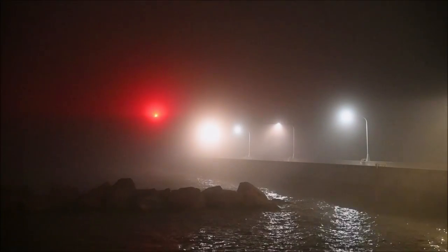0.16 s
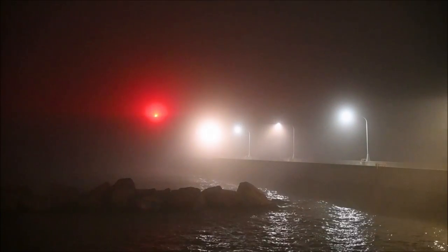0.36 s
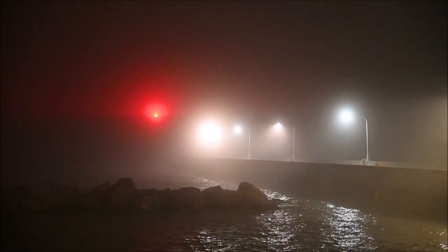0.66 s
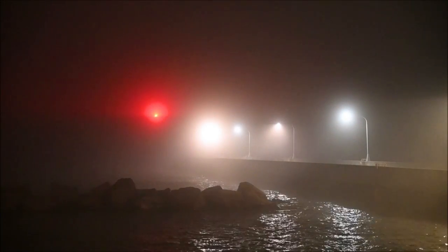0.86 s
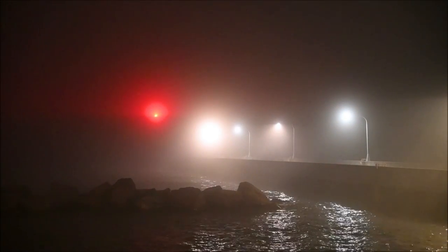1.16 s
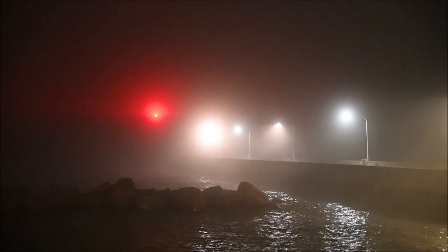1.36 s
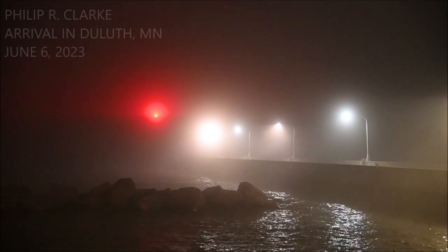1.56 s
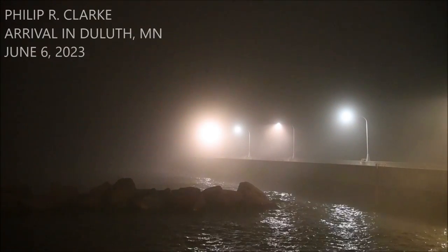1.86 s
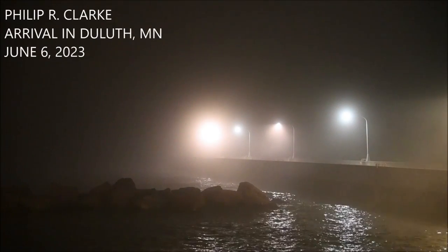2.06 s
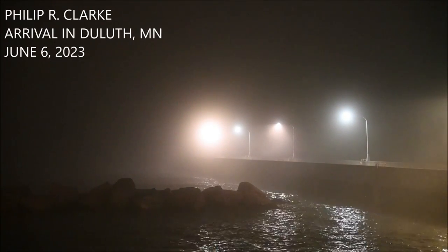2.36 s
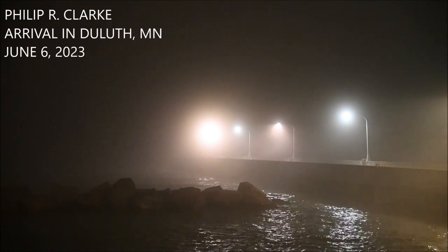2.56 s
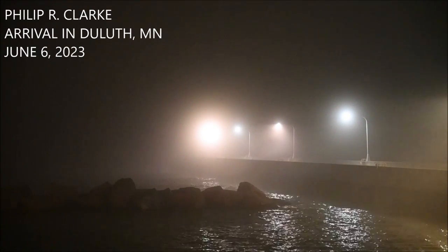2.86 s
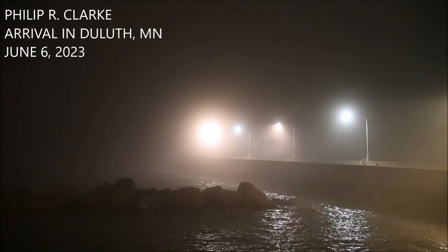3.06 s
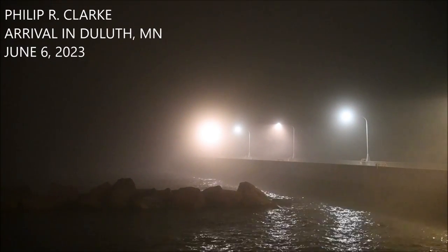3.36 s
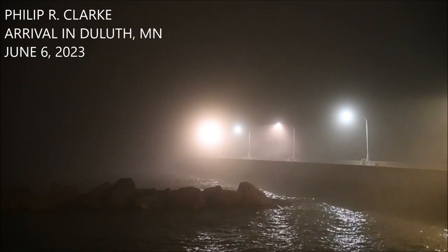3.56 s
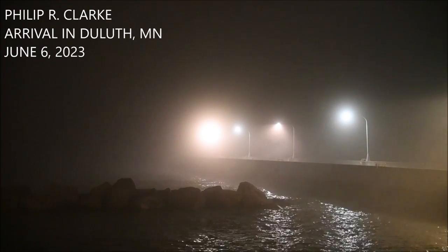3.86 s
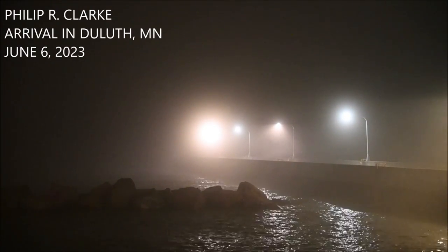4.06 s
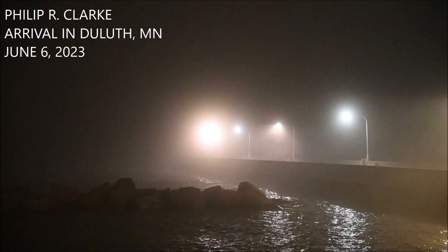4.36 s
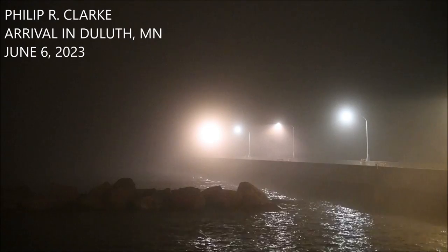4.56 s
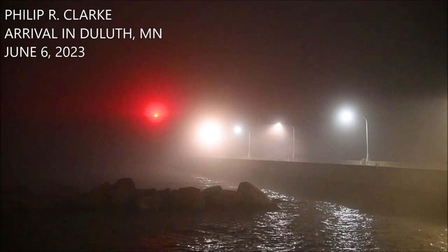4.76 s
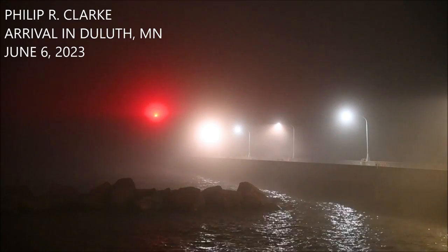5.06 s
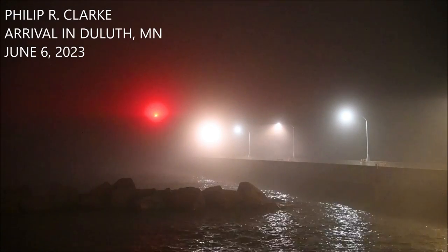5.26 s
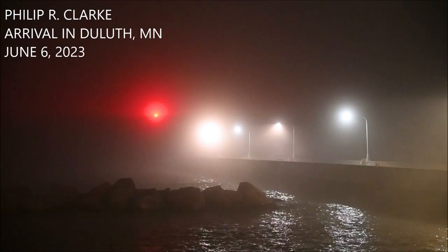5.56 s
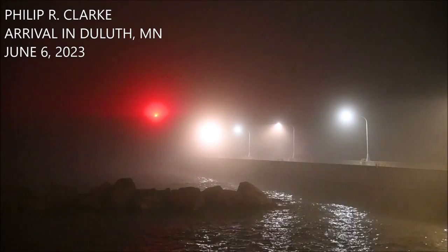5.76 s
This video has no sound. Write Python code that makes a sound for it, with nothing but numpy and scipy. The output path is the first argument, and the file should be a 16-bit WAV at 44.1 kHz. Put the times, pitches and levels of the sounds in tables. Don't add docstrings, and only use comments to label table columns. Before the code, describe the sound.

Small waves gurgle and slap softly on near rocks, swelling slowly from near silence, until a loud low ship horn starts at the end.

```python
import sys
import numpy as np
from scipy import signal
from scipy.fft import rfft, irfft
from scipy.io import wavfile
from scipy.ndimage import uniform_filter1d

SR = 44100
rng = np.random.default_rng(int(sys.argv[2]) if len(sys.argv) > 2 else 0)


def unload_audio(sound):
    columns = np.transpose(np.atleast_2d(sound))
    steps = np.round(np.clip(columns, -1, 1) * 32767)
    wavfile.write(sys.argv[1], SR, steps.astype(np.int16))


def gain_from_db(level_db):
    decades = np.asarray(level_db, float) / 20
    return 10 ** decades


N = 261072

# time_s, gurgle_db, froth_db (fizz against gurgle), depth_db (weight of large bubbles)
WATER_COURSE = [(0.0, -69, -8, 4), (0.03, -64.5, -10, 1), (0.36, -58.5, -12.5, -4.5), (0.8, -59.5, -17, 1),
                (1.37, -58, -16, 3), (1.6, -55, -16, 2), (1.74, -62, -11, .6), (1.9, -60, -16, 3),
                (2.54, -57.5, -17, 3), (3.0, -57.5, -13, 1.8), (3.2, -55.5, -12, 3.5),
                (3.55, -53, -11, 0.5), (4.3, -51.5, -14.5, 2.5), (4.5, -54.5, -13.5, 4),
                (4.85, -47.5, -17.5, 0.7), (5.1, -50, -15, 0), (5.45, -46, -21, 2.5),
                (5.92, -50.5, -17, .1)]
# crest_s, gurgle_lift_db, fizz_lift_db, fall_s
BREAKING_WAVES = [(.86, 3.5, 2, 0.029), (1.03, 2, 4, 0.017), (1.12, -1, 4, 0.026), (1.22, 0, 0.5, .1),
                  (1.46, 2.5, 9.5, 0.031), (1.519, -1.5, 12.5, 0.026), (1.63, -0.5, 0.5, 0.027),
                  (1.68, 1.5, 9, 0.03), (1.93, .3, 3.5, 0.028), (2.99, 2, 1, .05), (3.07, 1.3, 0, .04),
                  (3.27, 3, 1.5, 0.063), (3.97, 1, 1, 0.033), (4.1, 1.3, 3, 0.037), (4.39, 3.5, 2, 0.093),
                  (4.58, 2.2, 1, .1), (4.9, -1.5, 2, 0.045), (4.96, 1.5, 5.5, 0.01), (5.41, 0, 4.5, 0.035),
                  (5.52, .3, 2.2, 0.17)]
RISE_PER_FALL = 0.63
# frequency_hz, density_db (per Hz)
GURGLE_COLOUR = [(59, -43.5), (100, 4), (156, -8), (183, -8), (216, -7.5), (377, -4), (409, -2.5),
                 (701, 0.5), (1440, -4), (2680, -15), (5000, -25), (6500, -33), (11000, -120)]
# frequency_hz, density_db (per Hz)
WASH_COLOUR = [(15, -38), (30, -7), (60, -9), (150, 0), (250, -3.5), (400, -4.5), (800, -32.5)]
# frequency_hz, density_db (per Hz)
FIZZ_COLOUR = [(1200, -20), (2200, -1), (3800, -2.5), (6000, -8), (8500, -7), (9300, -23), (12000, -52)]
# frequency_hz, density_db (per Hz)
SPRAY_COLOUR = [(7000, -21), (9300, 2), (12000, -2.5), (14000, -7), (16000, -10)]
WASH_DB, WASH_PER_DEPTH, WASH_PER_LIFT = -15.5, 0.54, 0.63
SPRAY_DB, SPRAY_PER_FROTH, SPRAY_PER_BURST = -11.5, 0.73, 0.6
HAZE_DB = -36.5

# start_s, peak_db, dulling_db (per octave), centre_hz
SLAPS = [(0.2994, -53, 13, 1270), (0.387, -50, 7, 1220), (0.8494, -56, 7, 1420), (1.027, -48, 7, 1200),
         (1.266, -51, 4, 1230), (1.432, -43, 6, 1500), (1.4857, -39, 8.5, 1600), (1.511, -53, 20, 2340),
         (1.529, -41, 17, 1920), (1.558, -47, 6, 1220), (1.574, -49, 4, 1480), (1.627, -40, 10, 1840),
         (1.669, -51, 9, 1800), (1.683, -39, 8.5, 2160), (1.6903, -41, 11, 1560), (1.914, -49, 8, 1240),
         (2.986, -64, .3, 1220), (3.02, -45, 13, 1850), (3.491, -42, 7, 1260), (3.976, -44, 4, 1680),
         (4.092, -43, 8, 1260), (4.823, -48.5, 0, 1510), (5.013, -37, 9, 1610), (5.17, -55, 28, 5500),
         (5.3, -48, 12, 3000), (5.37, -44, 13, 3100), (5.392, -38, 14, 3200), (5.477, -45, 13, 3300)]
# start_s, peak_db, pitch_hz
PLOPS = [(0.268, -45, 1070), (0.331, -44, 662), (0.386, -46, 1150), (0.577, -47, 1360), (0.67, -45, 785),
         (0.829, -44, 773), (1.016, -46, 770), (1.031, -42.5, 620), (1.207, -43, 513), (1.4615, -49, 1000),
         (1.476, -44, 450), (1.52, -40, 1050), (1.56, -42, 930), (1.58, -42.5, 378), (1.605, -41, 563),
         (1.675, -38.5, 820), (2.392, -47.5, 354), (2.457, -42, 860), (2.494, -41.5, 560),
         (2.612, -41, 855), (2.694, -42, 626), (2.852, -44, 587), (2.983, -42, 835), (3.523, -41.5, 312),
         (3.961, -37, 760), (3.985, -38, 636), (4.384, -37, 935), (4.405, -37.5, 523), (4.942, -37.5, 370),
         (5.019, -41, 1080)]
# start_s, peak_db, pitch_hz, length_cycles
DROPLETS = [(1.1214, -58, 7500, 2), (1.265, -49, 5500, 1.5), (1.4483, -36, 950, 3), (1.4532, -38, 880, 3),
            (1.5844, -58, 8300, 5), (1.7344, -55, 7900, 4), (1.7534, -44, 6500, 1.5), (1.822, -62, 5600, 4),
            (1.828, -60, 11500, 3), (1.8645, -56, 9500, 2), (3.987, -54, 11000, 2), (4.0394, -54, 12500, 4),
            (4.258, -55, 12500, 2), (4.2632, -49, 8500, 3), (4.5735, -53, 12000, 2),
            (4.8694, -55, 10500, 4), (4.9596, -43, 4700, 3.5)]

# time_s, pitch_hz
HORN_PITCH = [(5.03, 94.83), (5.2, 94.78), (5.45, 94.8), (5.92, 94.87)]
# multiple, level_db
OVERTONES = [(1, -6), (2, -5), (3, -2), (4, 0), (5, 0), (6, -10), (7, -21), (8, -3), (9, -4), (10, -15),
             (11, -16), (12, -37), (13, -33), (14, -12), (15, -9), (16, -10), (17, -13), (18, -18),
             (19, -19), (20, -14), (21, -17), (22, -24), (23, -22), (24, -20), (25, -23), (26, -23),
             (27, -30), (28, -35), (29, -37), (30, -34)]
START_S, FIRST_PUFF_S = 5.03, 5.0132
OPEN_S, BUILD_S, PEAK_S, SETTLE_S = 0.024, 0.042, 0.095, 0.27
SHUT_DB, OPEN_DB, BUILD_DB, OVERSHOOT_DB = -24, -4, -4, 1.5
HOLD_DB = -30.5
DULL_DB_PER_KHZ, CLEAR_S = 62, 0.0388
ECHO_S, ECHO_RISE_S, ECHO_DB = 0.4, 0.22, -10.5


def evened(x):
    return x / np.sqrt(np.mean(x ** 2) + 1e-20)


def read(points, hz):
    f, value = np.transpose(points)
    return np.interp(np.log(hz + 1), np.log(f + 1), value)


def curves(rows):
    s, *columns = np.transpose(rows)
    return [np.interp(np.arange(N) / SR, s, column) for column in columns]


def add(mix, s, sound):
    part = mix[round(s * SR):][:len(sound)]
    part += sound[:len(part)]


def noise(colour, patchy_db, flicker_db, size=512):
    frames = 4 * N // size + 5
    hz = np.fft.rfftfreq(size, 1 / SR)
    real, imaginary, patches = rng.standard_normal((frames, len(hz), 3)).T
    patches = uniform_filter1d(patches, size=10, axis=0)
    patches = evened(uniform_filter1d(patches, size=14, axis=1))
    flicker = evened(uniform_filter1d(rng.standard_normal(frames), size=4))
    level_db = read(colour, hz)[:, None] + patchy_db * patches + flicker_db * flicker
    spectra = (real + 1j * imaginary) * gain_from_db(level_db)
    return evened(signal.istft(spectra, nperseg=size, noverlap=3 * size // 4)[1][:N])


def bubble(hz, cycles, rise):
    u = np.arange(int(3 * cycles / hz * SR)) / SR * hz / cycles
    ring = np.sin(2 * np.pi * cycles * (u + rise * u ** 2 / 2))
    return ring * np.exp(-2 * u) * np.minimum(u * cycles, 1)


def bubbles(colour, lo_hz, hi_hz, per_s, cycles, spread_db, clump, count=30):
    crowd = np.exp(clump * evened(uniform_filter1d(rng.standard_normal(N), size=900)))
    released = rng.random(N) < per_s / SR * crowd / crowd.mean()
    kind = np.where(released, rng.integers(0, count, N), -1)
    strength = gain_from_db(spread_db * np.minimum(rng.exponential(1, N), 5))
    out = np.zeros(N)
    for k, hz in enumerate(np.geomspace(lo_hz, hi_hz, count)):
        rung = signal.oaconvolve(strength * (kind == k), bubble(hz, cycles, 0.097))[:N]
        out += gain_from_db(read(colour, hz)) * hz * rung
    return evened(out)


def surges():
    crest_s, gurgle_db, fizz_db, fall_s = np.transpose(BREAKING_WAVES)
    coarse = np.arange(0, N, 32)
    u = (coarse[:, None] / SR - crest_s) / np.maximum(fall_s, 0.005)
    shape = np.exp(-np.where(u < 0, u / RISE_PER_FALL, u) ** 2)
    return [np.interp(np.arange(N), coarse, shape @ db) for db in (gurgle_db, fizz_db)]


def gurgle(depth_db):
    sound = 0.9 * noise(GURGLE_COLOUR, 1.0, 0.16)
    sound += 0.49 * bubbles(GURGLE_COLOUR, 266, 3550, 2500, 6.4, 1.4, 0.7)
    deep = signal.lfilter(*signal.butter(2, 520, fs=SR), sound)
    return sound + (gain_from_db(depth_db) - 1) * deep


def wash():
    return noise(WASH_COLOUR, 0.46, 0.46, size=2048)


def fizz():
    sound = 0.77 * noise(FIZZ_COLOUR, 0.68, 1.0, size=256)
    return sound + 0.31 * bubbles(FIZZ_COLOUR, 2010, 8150, 2500, 8.9, 4.3, 0.8)


def spray():
    sound = 0.8 * noise(SPRAY_COLOUR, 1.1, 0.6, size=256)
    return sound + 0.36 * bubbles(SPRAY_COLOUR, 9000, 15000, 300, 3.0, 4.0, 0.9)


def water():
    swell_db, froth_db, depth_db = curves(WATER_COURSE)
    lift_db, burst_db = surges()
    wash_db = WASH_DB + WASH_PER_DEPTH * depth_db + WASH_PER_LIFT * lift_db
    fizz_db = froth_db + burst_db + 3.5
    spray_db = froth_db + SPRAY_DB + SPRAY_PER_BURST * burst_db
    spray_db += SPRAY_PER_FROTH * (froth_db - froth_db.mean())
    mix = gain_from_db(lift_db) * gurgle(depth_db) + gain_from_db(wash_db) * wash() + gain_from_db(fizz_db) * fizz()
    mix += np.hypot(gain_from_db(spray_db), gain_from_db(HAZE_DB)) * spray()
    return gain_from_db(swell_db) * mix


def slaps():
    size = 4096
    out, hz, t = np.zeros(N), np.fft.rfftfreq(size, 1 / SR), np.arange(size) / SR
    envelope = np.minimum(t / 0.0035, 1) * np.exp(-(t / 0.015) ** 2)
    treble_db = read([(8500, -3), (9500, -12.0), (15000, -25)], hz)
    for s, db, dull_db, centre_hz in SLAPS:
        hiss, clumps = rng.standard_normal((2, size))
        clumps = np.clip(evened(uniform_filter1d(clumps, size=70)), -2, 1.2)
        grains = hiss * np.exp(0.6 * clumps)
        colour = gain_from_db(-dull_db * abs(np.log2((hz + 1) / centre_hz)) + treble_db)
        burst = evened(irfft(rfft(grains) * colour))
        add(out, s, gain_from_db(db - 12) * burst * envelope)
    return out


def plops_and_droplets():
    out = np.zeros(N)
    for s, db, pitch_hz in PLOPS:
        add(out, s, gain_from_db(db - 3.0) * bubble(pitch_hz, 5.7, 0.032))
    for s, db, pitch_hz, cycles in DROPLETS:
        add(out, s, gain_from_db(db + 4) * bubble(pitch_hz, cycles, 0.04))
    return out


def horn():
    start = round(START_S * SR)
    t = np.arange(N - start) / SR
    pressure_s = [0, OPEN_S, BUILD_S, PEAK_S, SETTLE_S]
    level_db = HOLD_DB + np.interp(t, pressure_s, [SHUT_DB, OPEN_DB, BUILD_DB, OVERSHOOT_DB, 0])
    dull_db = DULL_DB_PER_KHZ * np.maximum(1 - (t / CLEAR_S) ** 2, 0)
    hz = curves(HORN_PITCH)[0]
    turns = (np.cumsum(hz) - np.sum(hz[:round(FIRST_PUFF_S * SR)])) / SR
    hz, turns = hz[start:], turns[start:]
    tops_db = np.r_[np.transpose(OVERTONES)[1], -34 - 0.27 * np.arange(8) ** 2]
    echoes = gain_from_db(ECHO_DB) * np.sqrt(uniform_filter1d(gain_from_db(tops_db) ** 2, size=7))
    filled = np.clip((t - ECHO_S) / ECHO_RISE_S, 0, 1)
    out = 0
    for k, (top, echo) in enumerate(zip(gain_from_db(tops_db), echoes), 1):
        f, p = rng.uniform(0.7, 9, 8), rng.random(8)
        waver = np.sin(2 * np.pi * (t[::200, None] * f + p)).sum(1)
        waver_db = 0.065 * np.sqrt(k) * np.interp(t, t[::200], waver)
        mirror = np.angle(1 - 1.4 * np.exp(-2j * np.pi * k / 6.9))
        flare = -3 * np.log(k)
        late = np.sign(0.5 - p[0]) * np.arctan2(filled * echo, top)
        strength = np.hypot(top, filled * echo) * gain_from_db(waver_db - dull_db * k * hz / 1000)
        out = out + strength * np.cos(2 * np.pi * k * turns + mirror + flare + late)
    blast = gain_from_db(level_db) * out / np.sqrt(np.sum(gain_from_db(tops_db) ** 2) / 2)
    return np.r_[np.zeros(start), blast]


def scene():
    mix = water() + slaps() + plops_and_droplets() + horn()
    fade = np.minimum(np.arange(N)[::-1] / SR / 0.004, 1)
    return (mix * fade)[None]


def band_limit(x):
    return signal.sosfilt(signal.butter(12, 15610, fs=SR, output="sos"), x)


def record(dry):
    return band_limit(dry)


dry = scene()
out = record(dry)
unload_audio(out)
```